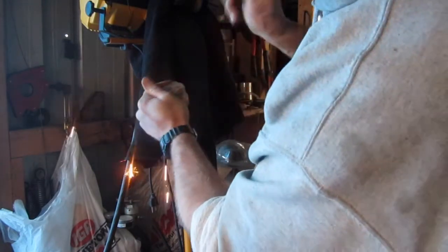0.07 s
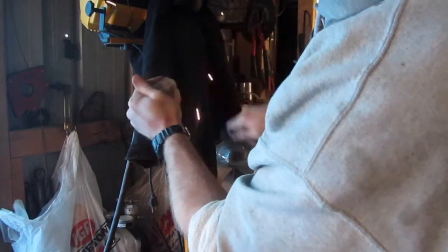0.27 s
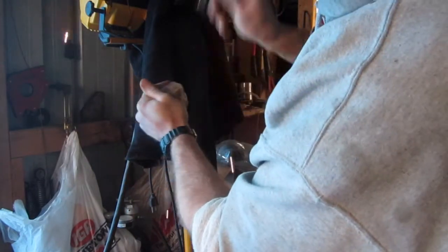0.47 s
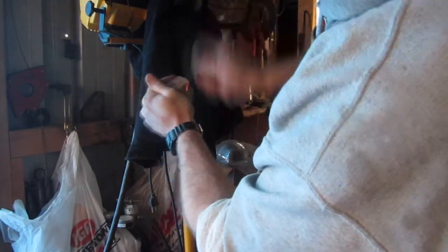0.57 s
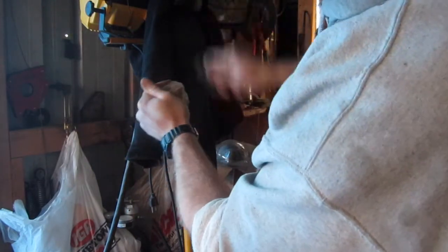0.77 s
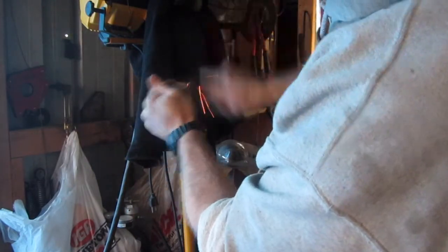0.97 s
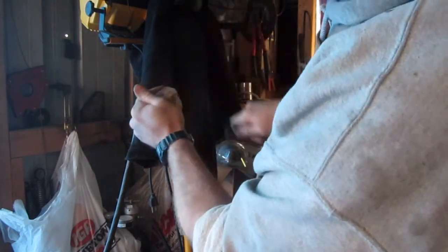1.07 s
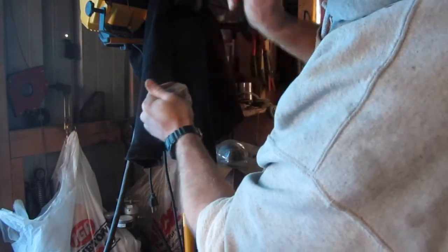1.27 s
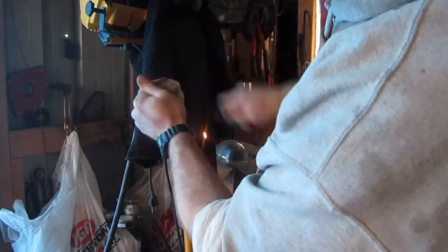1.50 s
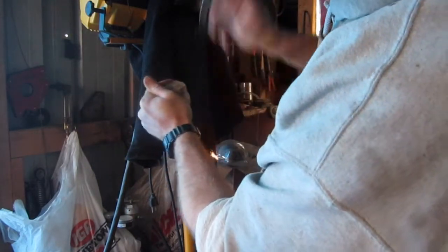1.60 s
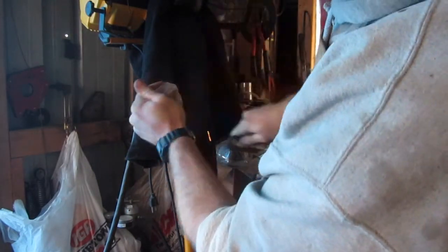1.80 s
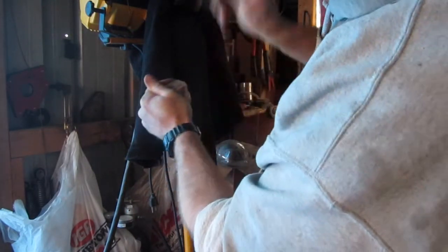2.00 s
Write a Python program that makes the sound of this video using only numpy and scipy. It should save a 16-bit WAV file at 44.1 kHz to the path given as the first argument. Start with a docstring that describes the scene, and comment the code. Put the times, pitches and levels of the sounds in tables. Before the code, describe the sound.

A hard steel striker hits stone with sharp, thin, very loud clicks at about 0.22, 0.61, 0.99, 1.38 and 1.76 seconds. Each blow is a tight cluster of contacts with a gritty scrape and short, high clink, then a brief small-room tail. Tiny grit ticks faintly between 1.1 and 1.3 seconds. Low rumble and thin hiss continue throughout, dipping after blows as the close camera microphone adjusts its level.

```python
"""Small cluttered workshop, camera microphone close to the stone: a low rumble and thin hiss of shaped noise
run throughout. A steel striker glances off a lump of quartz five times, two to five contacts a blow: one-cycle
cracks, noise ticks and scrapes, and decaying sine modes of stone and steel. The room answers each with a short
dense tail of decaying noise. After the third blow filtered noise bursts tick as grit lands.
The camera's gain control ducks everything at each blow and recovers."""
import sys
import numpy as np
from scipy import signal
from scipy.fft import rfft, irfft
from scipy.io import wavfile
from scipy.ndimage import uniform_filter1d

SR = 44100
rng = np.random.default_rng(int(sys.argv[2]) if len(sys.argv) > 2 else 0)


def generate_wav(signal):
    """Clip the signal to [-1, 1] and save it as 16-bit WAV at the path in sys.argv[1]."""
    frames = np.transpose(np.atleast_2d(signal))
    scaled = np.clip(frames, -1, 1) * 32767
    pcm = np.round(scaled).astype(np.int16)
    wavfile.write(sys.argv[1], SR, pcm)


N = 90404  # samples, 2.05 s

# All source levels are those ahead of the camera's gain control.


def amp(db):
    """Decibels to an amplitude factor."""
    return 10 ** (np.asarray(db) / 20)


def decay(t, t60):
    """Exponential fade that loses 60 dB in t60 seconds."""
    return np.exp(-np.log(1000) * t / t60)


def band(x, hz, width):
    """Band-pass from hz / width to hz * width."""
    edges = [hz / width, min(hz * width, SR / 2.1)]
    return signal.sosfilt(signal.butter(2, edges, "band", fs=SR, output="sos"), x)


def low_cut(x, hz):
    """High-pass that takes the bass off below hz."""
    return signal.sosfilt(signal.butter(2, hz, "high", fs=SR, output="sos"), x)


def add(out, start_s, sound):
    """Mix a sound into out from start_s, cut off at the end."""
    i = int(start_s * SR)
    out[i:i + len(sound)] += sound[:N - i]


def walk(rate):
    """Random levels, each held 1 / rate s, then smoothed twice into a slow drift."""
    hold = int(SR / rate)
    steps = np.repeat(rng.standard_normal(N // hold + 1), hold)
    return uniform_filter1d(uniform_filter1d(steps, hold), hold)[:N]


# Spectral shape of the workshop's background. Each row: frequency in Hz, relative density in dB per Hz.
BACKGROUND_SPECTRUM = [(18, -68.5), (30, -0.5), (50, -23.5), (80, -3), (121, -15), (154, -7.5), (220, -2.5),
                       (270, -8), (322, 0), (360, -10.5), (420, -12), (531, -13.5), (640, -13), (999, -30),
                       (2090, -36.5), (3300, -44.5), (4200, -43), (4900, -35.5), (6000, -45.5), (9000, -45),
                       (10600, -39), (11500, -40.5), (12500, -42.5), (15300, -44), (15900, -71),
                       (16300, -84)]
# Swell of the low rumble at the microphone. Each row: time in seconds, level in dB.
RUMBLE_LEVEL = [(0., -38), (.07, -38.5), (.19, -35), (.32, -38.5), (.56, -34.5), (0.699, -35.5),
                (.92, -36.5), (1.1, -34), (1.2, -36), (1.35, -36.5), (1.59, -35), (1.719, -35.5),
                (1.85, -37), (2.05, -35)]
HISS_DB = -53.5
FLICKER_DB, FLICKER_RATE_HZ = 0.785, 15.86  # spread of the random levels before smoothing, and their rate


def background():
    """Shaped noise: steady hiss above 1 kHz, and a rumble below that swells and flickers band by band."""
    f = np.fft.rfftfreq(N, 1 / SR) + 1  # 1 Hz up, to keep the logarithm finite
    hz, db = np.array(BACKGROUND_SPECTRUM).T
    shape = amp(np.interp(np.log(f), np.log(hz), db))
    spectrum = rfft(rng.standard_normal(N)) * shape
    hiss = irfft(spectrum * (f > 1000), N)
    rumble = np.zeros(N)
    for low, high in [(1, 125), (125, 250), (250, 500), (500, 1000)]:
        part = irfft(spectrum * (f > low) * (f <= high), N)
        rumble += part * amp(FLICKER_DB * walk(FLICKER_RATE_HZ))
    swell = amp(np.interp(np.arange(N) / SR, *np.array(RUMBLE_LEVEL).T))
    return amp(HISS_DB) * hiss / np.std(hiss) + swell * rumble / np.std(rumble)


MODE_SCATTER_DB = 0.85


def ring(modes, t):
    """Sum of decaying sine modes, each with a little random spread in level at every contact."""
    hz, db, t60 = np.array(modes).T[:, :, None]
    db = db + MODE_SCATTER_DB * rng.standard_normal(db.shape)
    return np.sum(amp(db) * np.sin(2 * np.pi * hz * t) * decay(t, t60), axis=0) / 2


# Steel touching stone, close to the microphone. Each row: start in seconds, crack level in dB, crack pitch
# in Hz, stone ring in relative dB, steel ring in relative dB, scrape level in dB before band-passing.
STEEL_ON_STONE = [(0.2226, 5.5, 2600, -4.5, 1, 4.5), (0.2222, -8, 3190, -9.5, -26, 1),
                  (.2300, -13.5, 2400, -11, -16, -12), (.2380, -6.5, 2400, -11, -18, -10.5),
                  (.6065, 3.5, 2440, 0, 3.5, 2), (0.6184, -7.5, 2500, -69, -30, -33),
                  (0.9907, 0.3, 2910, -13, -3.5, 0.5), (0.9924, -8.5, 2750, -1, -27, -6),
                  (1.0033, -3, 2770, -16, -31, -29), (1.3780, 1, 2484, 0, -6, -2),
                  (1.3802, 0, 2340, -13.5, -32, -6.5), (1.3835, -39, 3000, -14, 1.5, -1),
                  (1.387, -40, 3000, -11, 5, -27), (1.3948, -10, 2560, -40, -0.5, -7),
                  (1.7608, -0.5, 2600, -7, 2, -0.5), (1.7617, -3, 3400, -10, -12, -9),
                  (1.7630, -12, 2950, -1, -7, -4), (1.7671, -14, 2400, -28, -15, -27)]
# Ringing modes of the quartz. Each row: frequency in Hz, relative level in dB, t60 in seconds.
STONE_MODES = [(977, -13, 0.012), (1598, -46, 0.045), (1948, -1.5, .03), (2251, 4.3, 0.021),
               (2520, 5.5, 0.0083), (2930, -2, 0.0098)]
# Ringing modes of the striker. Each row: frequency in Hz, t60 in seconds.
STEEL_MODES = [(5200, 0.017), (6715, 0.052), (7450, 0.013), (8540, 0.014), (9900, 0.014), (11450, .016),
               (13200, .018), (14950, .016)]
# Where the striker is hit decides which modes sound. Each row: blow time in seconds, then the relative
# level in dB of each steel mode in turn.
STEEL_MODES_PER_BLOW = [(.2223, -2, -18, 0.5, 5.5, -10, -5, -5, -8),
                        (.6065, 2.5, -7.5, 2.5, -11, -6, -7, -24, -32),
                        (.9909, -0.5, -1, 7.5, -10, -36, -23, -1, -4),
                        (1.3780, -13, -16.5, -48, -27, -13, -19, -19, -16),
                        (1.7608, 2, -7, 5.5, 0.5, -2, -8, -9, -21)]
CRACK_LOW_HZ = 1390  # keeps the cracks thin and bright, with little below this pitch
TICK_DB, TICK_T60_S = -9.5, 0.002  # bright spit at first touch, against the crack
SCRAPE_T60_S, STONE_LOW_HZ = 0.0082, 450


def strikes():
    """Each contact is one swing of pressure up and down, a spit, a scrape, and rings of stone and steel."""
    stone, steel = np.zeros(N), np.zeros(N)
    t = np.arange(SR // 12) / SR
    for start_s, crack_db, hz, stone_db, steel_db, scrape_db in STEEL_ON_STONE:
        blow = min(STEEL_MODES_PER_BLOW, key=lambda row: abs(row[0] - start_s))  # nearest in time
        steel_modes = [(f, db, t60) for (f, t60), db in zip(STEEL_MODES, blow[1:])]
        tick_noise, scrape_noise = rng.standard_normal((2, len(t)))
        one_cycle = np.sin(2 * np.pi * hz * t) * (t < 1 / hz)
        crack = low_cut(one_cycle, CRACK_LOW_HZ)
        tick = amp(TICK_DB) * band(tick_noise, 15000, 1.35) * decay(t, TICK_T60_S)
        scrape = amp(scrape_db) * band(scrape_noise, 4600, 2.18) * decay(t, SCRAPE_T60_S)
        add(stone, start_s, amp(crack_db) * (crack + tick) + scrape)
        add(stone, start_s, amp(stone_db) * ring(STONE_MODES, t))
        add(steel, start_s, amp(steel_db) * ring(steel_modes, t))
    return low_cut(stone, STONE_LOW_HZ), steel


# Bands of the workshop's tail. Each row: centre in Hz, relative level in dB, t60 in seconds.
ROOM_BANDS = [(700, -17, 0.11), (1296, -22, 0.19), (2590, -17, .14), (5200, -9, 0.15), (11200, -10.5, 0.15)]
ROOM_DB, ROOM_GAP_S, ROOM_BUILD_S = -29, 0.003, 0.001


def room(x):
    """Dense echoes off shelves and walls: octave bands of noise that build up quickly and die at own rates."""
    t = np.arange(SR // 3) / SR
    echoes = np.zeros(len(t))
    for hz, db, t60 in ROOM_BANDS:
        noise = band(rng.standard_normal(len(t)), hz, np.sqrt(2))
        noise /= np.sqrt(hz / SR)  # evens out the power of wide and narrow bands
        echoes += amp(db) * noise * decay(t, t60)
    echoes *= 1 - np.exp(-t / ROOM_BUILD_S)
    echoes = np.concatenate([np.zeros(int(ROOM_GAP_S * SR)), echoes])
    return amp(ROOM_DB) * signal.fftconvolve(x, echoes)[:N]


# Grit landing on the bench. Each row: start in seconds, tick level in relative dB, tick pitch in Hz,
# hiss level in dB before band-passing.
GRIT_LANDINGS = [(1.092, -56, 12500, -46), (1.143, -54, 5470, -44), (1.177, -51, 4930, -59.5),
                 (1.279, -43, 4000, -48)]
GRIT_T60_S = 0.05


def grit():
    """Tiny chips tick on the bench: decaying noise, narrowed round a pitch, with a wash of hiss."""
    out = np.zeros(N)
    t = np.arange(SR // 15) / SR
    for start_s, tick_db, hz, hiss_db in GRIT_LANDINGS:
        tick_noise, hiss_noise = rng.standard_normal((2, len(t))) * decay(t, GRIT_T60_S)
        tick = 3 * band(band(tick_noise, hz, 1.6), hz, 1.6)
        hiss = band(band(hiss_noise, 8500, 1.5), 8500, 1.5)
        add(out, start_s, amp(tick_db) * tick + amp(hiss_db) * hiss)
    return out


STEEL_SEND_DB = -8  # the steel reaches the room weaker than the stone


def scene():
    """Everything reaching the microphone: background, direct stone, steel and grit, and the room."""
    stone, steel = strikes()
    stone_and_grit = stone + grit()
    tail = room(stone_and_grit + amp(STEEL_SEND_DB) * steel)
    return (stone_and_grit + steel + tail + background())[None]


def heard_db(x, seconds):
    """Running power in dB, averaged with a time constant in seconds."""
    keep = np.exp(-1 / (seconds * SR))
    power = signal.lfilter([1 - keep], [1, -keep], x ** 2)
    return 10 * np.log10(power + 1e-12)


def duck(level_db, knee_db, slope):
    """Soft-kneed gain: well above the knee, slope dB down for each dB up."""
    return (1 + amp(level_db - knee_db)) ** -slope


AGC_ATTACK_S, AGC_KNEE_DB, AGC_SLOPE = 0.01, -27, 0.27
AGC_LEVEL_FALL_DB_S = 57  # how fast the held level, not the gain, lets go
AGC_MEMORY_S, AGC_MEMORY_KNEE_DB, AGC_MEMORY_SLOPE = 2.9, -32.5, 0.37  # slow stage, sinks as blows add up
MIC_LOW_HZ, TOP_HZ = 45.4, 16400


def record(dry):
    """Camera: gain ducks after each blow and creeps back; bass is cut, peaks clip, the top is cut."""
    fall_db = AGC_LEVEL_FALL_DB_S * np.arange(N) / SR
    # peak hold whose level falls steadily
    held_db = np.maximum.accumulate(heard_db(dry[0], AGC_ATTACK_S) + fall_db) - fall_db
    gain = duck(held_db, AGC_KNEE_DB, AGC_SLOPE)
    gain *= duck(heard_db(dry[0], AGC_MEMORY_S), AGC_MEMORY_KNEE_DB, AGC_MEMORY_SLOPE)
    clipped = np.clip(low_cut(dry * gain, MIC_LOW_HZ), -1, 1)
    return signal.sosfilt(signal.ellip(10, 0.2, 70, TOP_HZ, fs=SR, output="sos"), clipped)


dry = scene()
out = record(dry)
generate_wav(out)
```